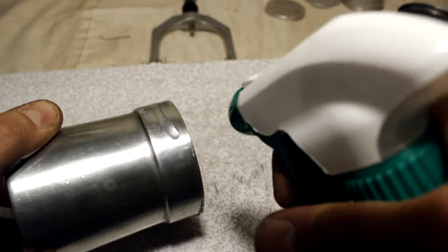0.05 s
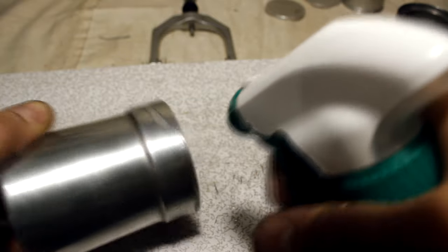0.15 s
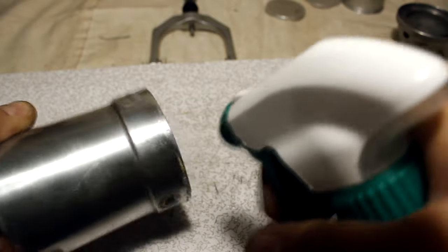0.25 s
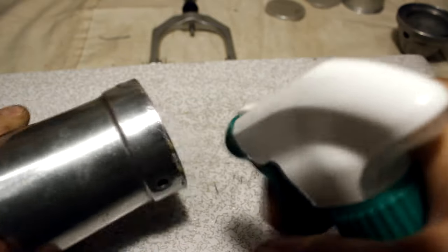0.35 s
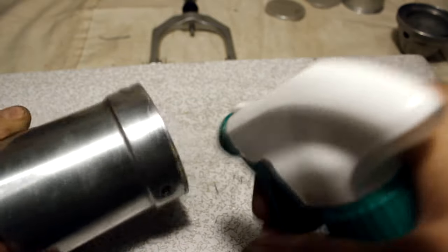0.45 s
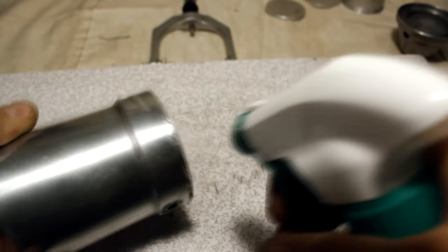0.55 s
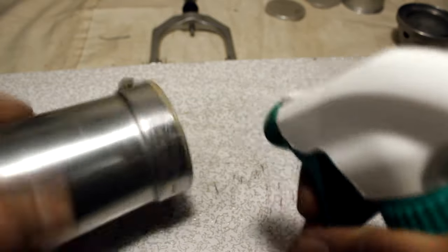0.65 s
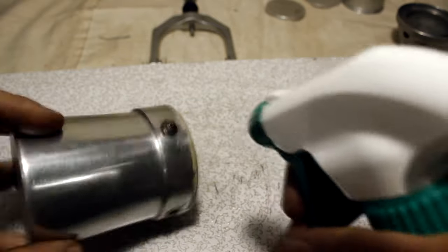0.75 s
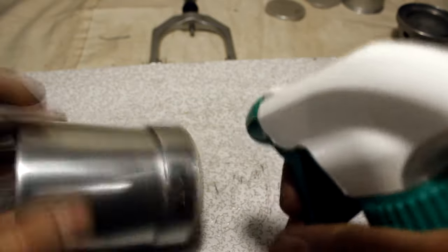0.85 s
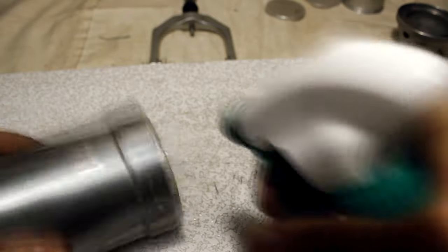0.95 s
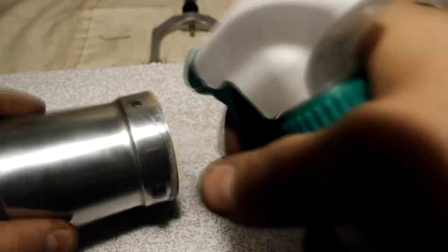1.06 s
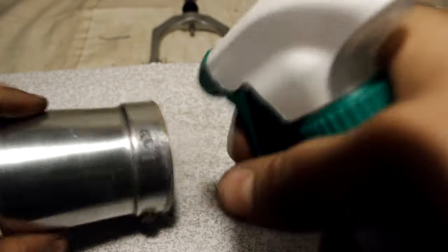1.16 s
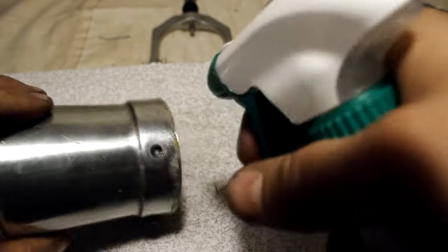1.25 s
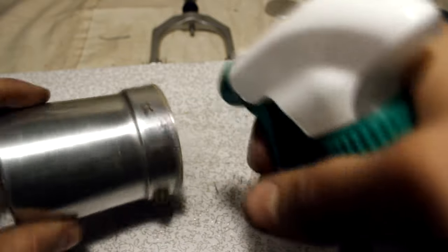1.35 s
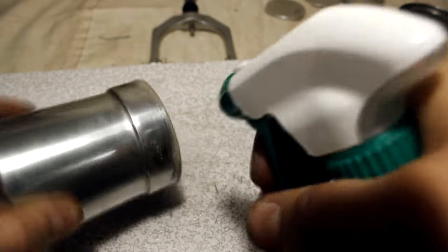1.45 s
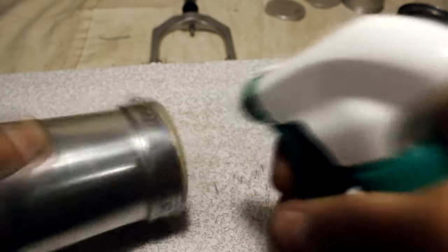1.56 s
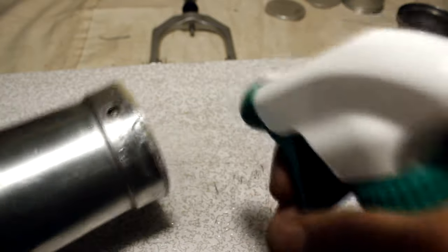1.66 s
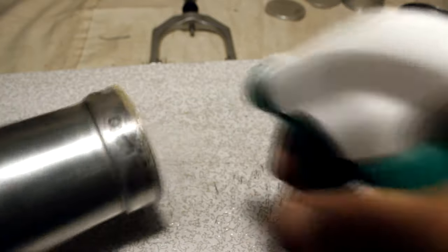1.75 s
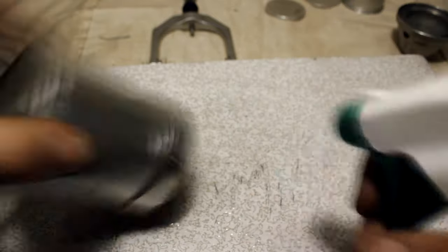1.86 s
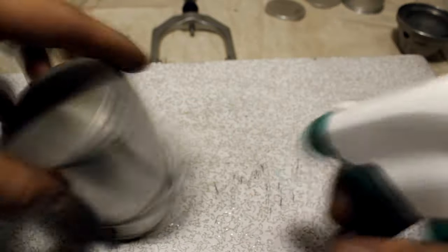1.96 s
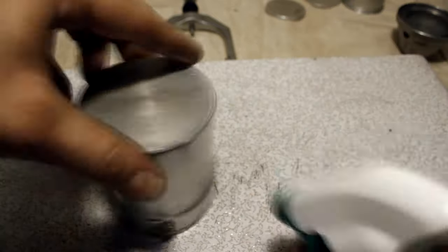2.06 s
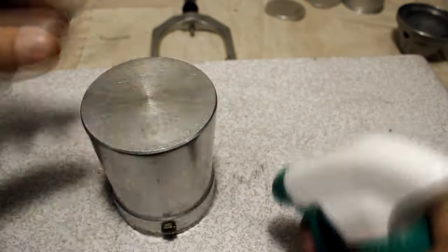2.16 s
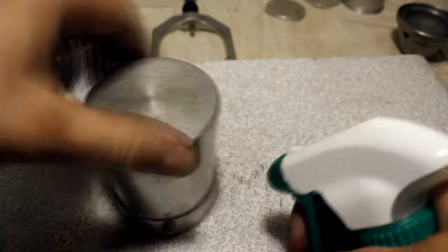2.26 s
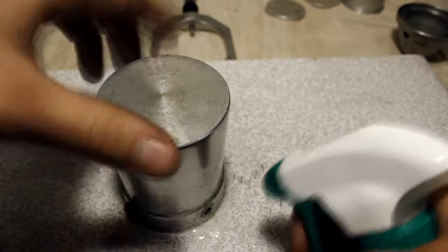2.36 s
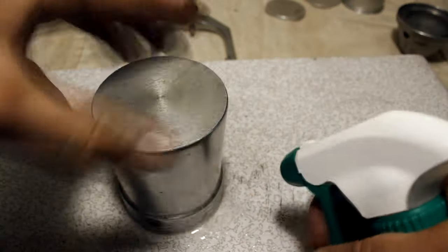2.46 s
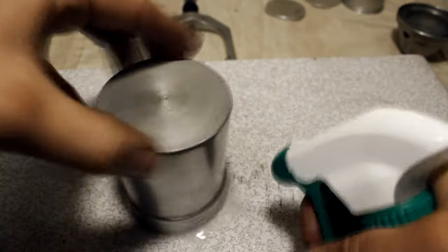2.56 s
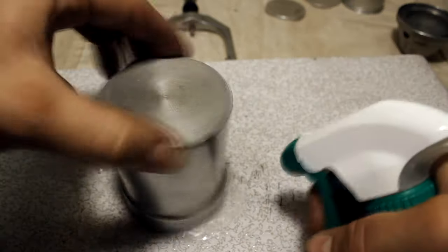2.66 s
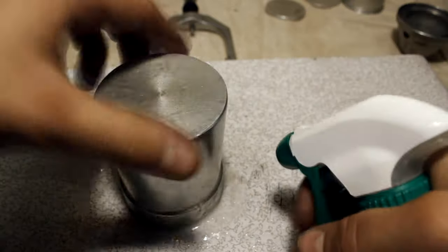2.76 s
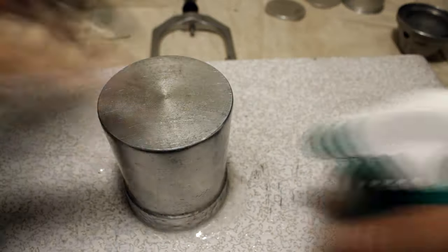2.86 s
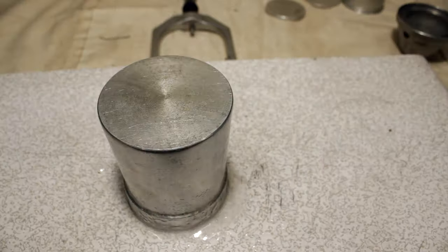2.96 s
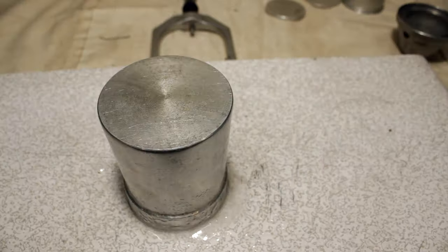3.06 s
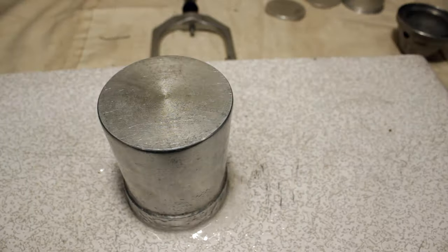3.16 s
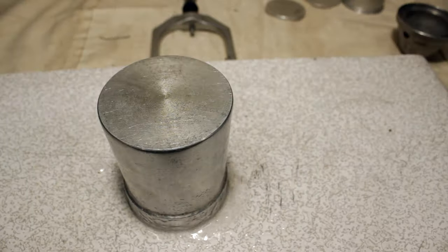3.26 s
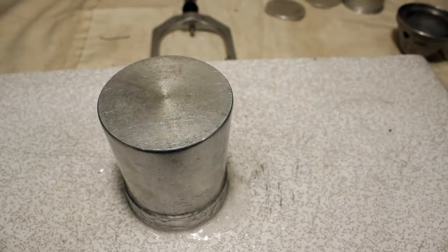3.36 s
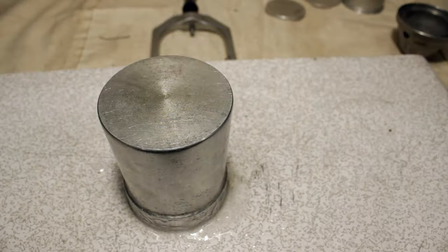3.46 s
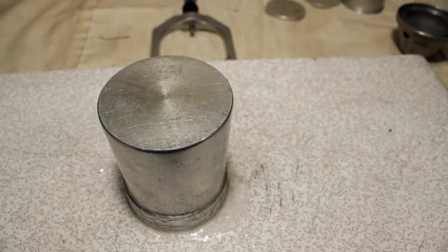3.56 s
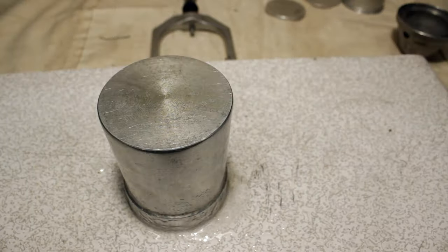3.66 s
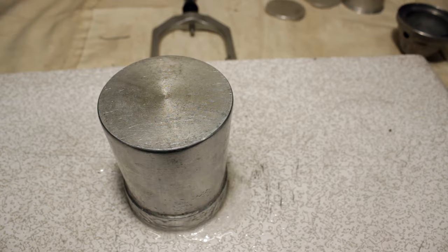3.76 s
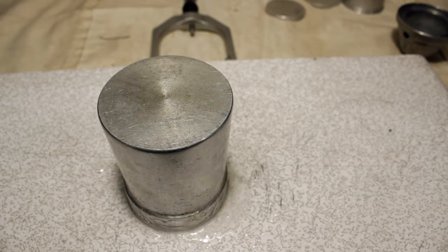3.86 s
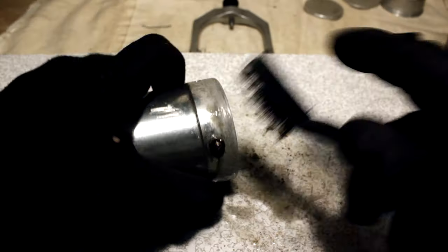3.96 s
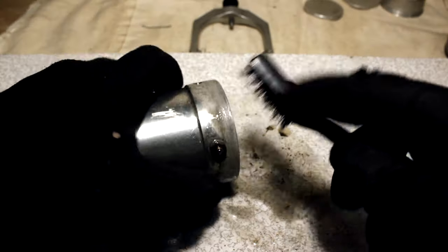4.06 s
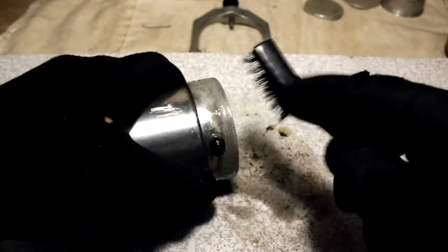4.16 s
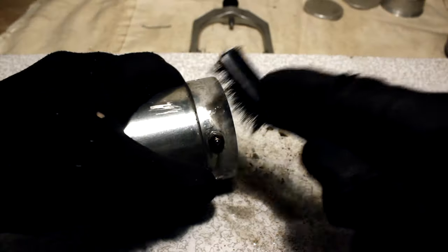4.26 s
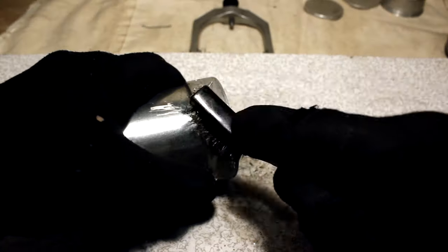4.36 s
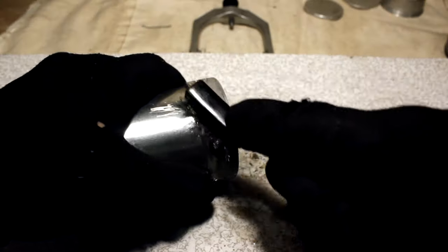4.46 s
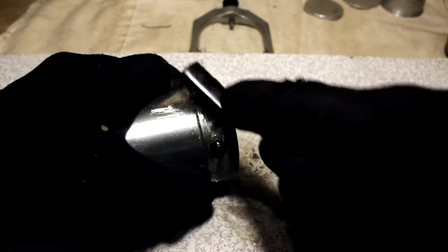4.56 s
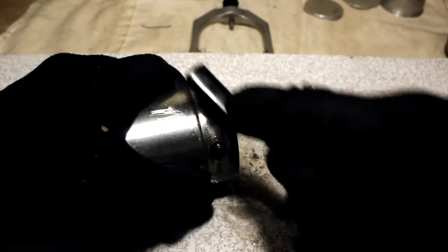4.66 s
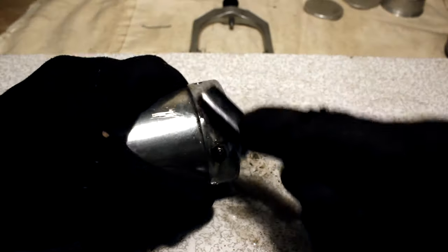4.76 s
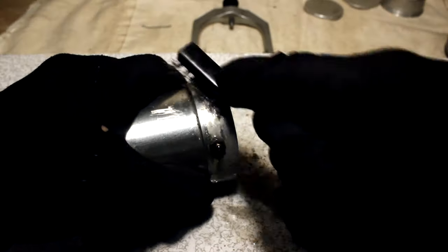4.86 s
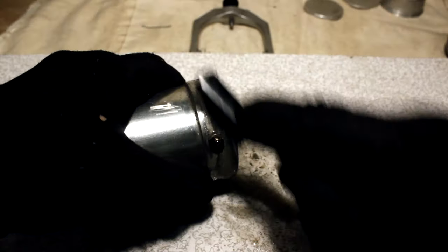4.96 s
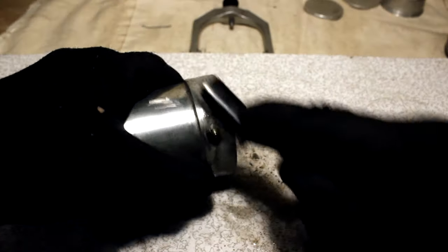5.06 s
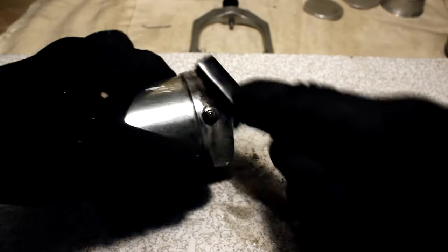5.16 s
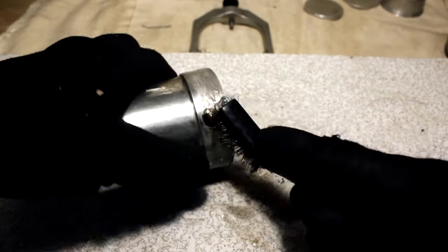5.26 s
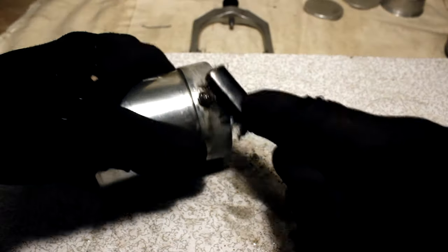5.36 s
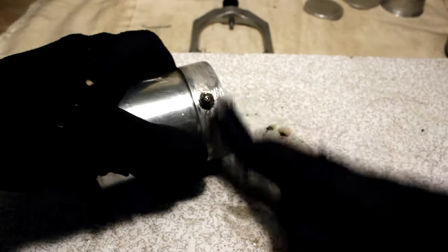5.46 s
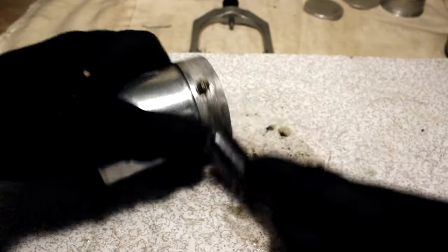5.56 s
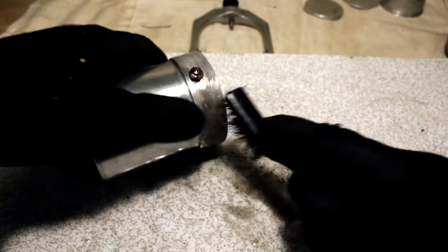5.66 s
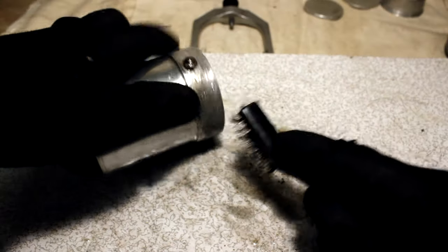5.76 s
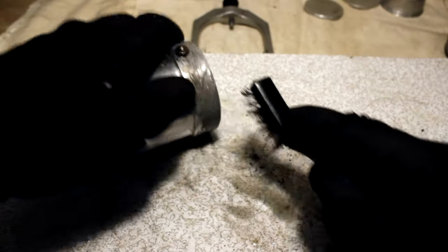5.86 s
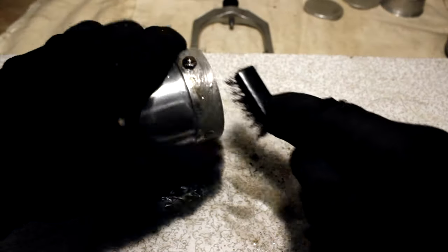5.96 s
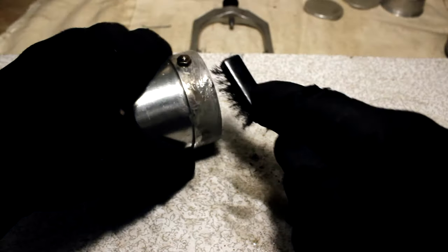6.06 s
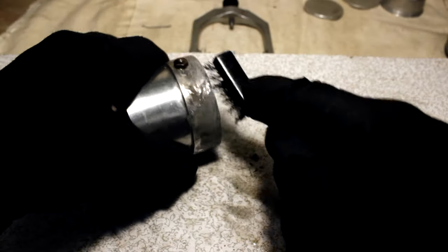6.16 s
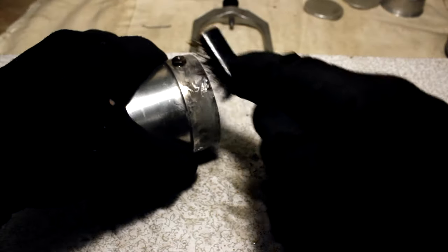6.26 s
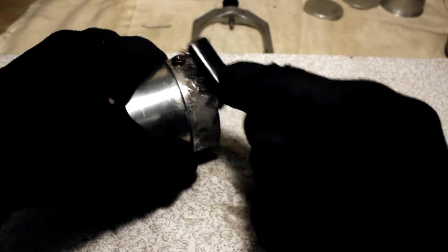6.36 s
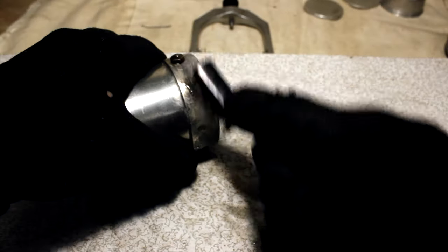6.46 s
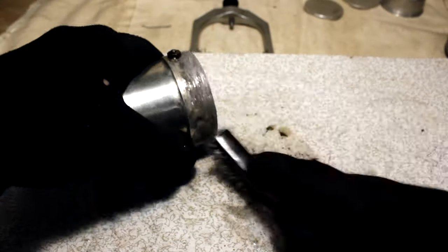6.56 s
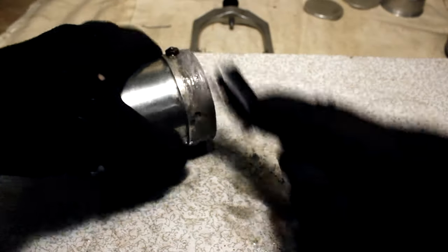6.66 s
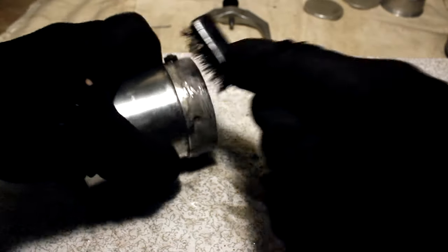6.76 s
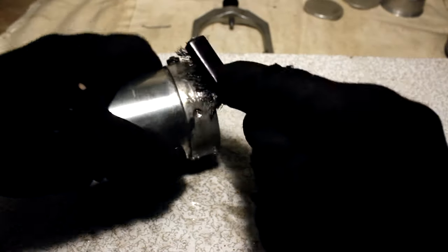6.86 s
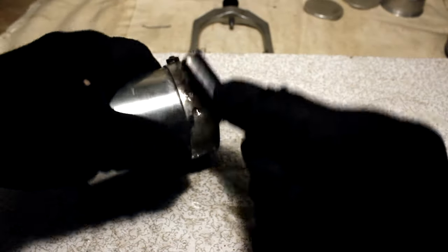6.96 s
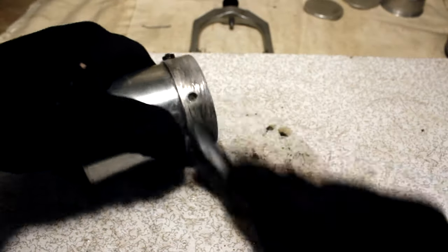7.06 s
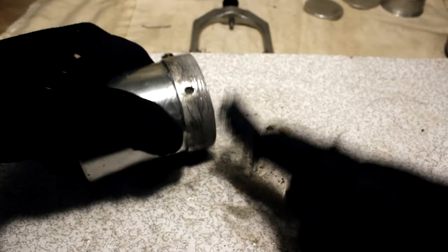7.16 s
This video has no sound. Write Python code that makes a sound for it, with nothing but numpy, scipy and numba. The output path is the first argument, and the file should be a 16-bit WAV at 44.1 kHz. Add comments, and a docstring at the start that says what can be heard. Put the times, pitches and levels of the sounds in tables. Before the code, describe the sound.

Close up in a quiet workshop, a pump bottle squirts rapid short hisses onto a small aluminium pot, its wall giving a faint clear ring. The pot is knocked, set down on a padded bench and turned with dull metallic rubs amid more squirts. After a near-silent pause with a soft thud and faint glove squeak, a stiff brush scrubs the hand-damped pot in uneven, hollow, raspy strokes with clicks and snaps.

```python
"""First a faint rub on a small aluminium pot in a quiet workshop, then a pump bottle squirts cleaner on it: jets hiss
and the wall rings. The pot is knocked, stood on a padded bench and turned, then scrubbed in a gloved hand.
Random catches and slips of a small stiff brush drive the pot's resonances; pressure raises some of them.
Short pushes make the knocks and short noise bursts the bristle snaps. Filtered noise gives the hiss, rasp and
room tone; the glove's squeak is a set of wavering partials. All is heard close up."""
import sys
import numpy as np
from scipy import signal
from scipy.fft import rfft, irfft
from scipy.io import wavfile
from scipy.ndimage import uniform_filter1d
from numba import njit

SR = 44100
rng = np.random.default_rng(int(sys.argv[2]) if len(sys.argv) > 2 else 0)


def dump_mix(stems):
    """Bounce the given channels to the path in sys.argv[1] as a 16-bit WAV at rate SR."""
    frames = np.atleast_2d(stems).T  # one column per channel
    limited = np.clip(frames, -1, 1)  # hard clip at full scale
    pcm = np.round(limited * 32767).astype(np.int16)
    wavfile.write(sys.argv[1], SR, pcm)


N = 317520
T = np.arange(N) / SR
FREE_HZ = 2750  # the wall's main resonance with no brush pressing on it


def undb(db):
    """Turn decibels into a gain."""
    return 10 ** (np.asarray(db) / 20)


def even(x, seconds=0.045):
    """Hold the rms near 1 over a sliding window; the finer grain stays."""
    window = max(int(seconds * SR), 8)
    power = np.abs(uniform_filter1d(x * x, window))
    return x / np.sqrt(power + 1e-14)


def add(out, s, x):
    """Mix x into out at time s, in seconds."""
    i = int(s * SR)
    out[i:i + len(x)] += x[:N - i]


def peak(x, db):
    """Scale x to a peak level."""
    return x * undb(db) / np.abs(x).max()


@njit
def svf(x, hz, width):
    """A resonance whose centre and width may move: a state-variable band-pass with gain 1 at its centre."""
    y, band, low = np.empty(len(x)), 0., 0.
    for i in range(len(x)):
        g = np.tan(np.pi * hz[i] / SR)
        k = width[i] / hz[i]
        v = (band + g * (x[i] + 1e-18 - low)) / (1 + g * (g + k))
        band = 2 * v - band
        low = low + 2 * g * v
        y[i] = k * v
    return y


def resonate(x, hz, width):
    """One fixed resonance, gain 1 at its centre."""
    g = np.tan(np.pi * min(hz / SR, .44))
    k = width / hz
    feedback = [1 + g * k + g * g, 2 * g * g - 2, 1 - g * k + g * g]
    return signal.lfilter([g * k, 0, -g * k], feedback, x + 1e-18)


def colour(x, spectrum):
    """Shape x to a spectrum with a filter that only looks back in time."""
    hz, db = np.transpose(spectrum)
    size = 8192
    bin_hz = np.arange(size // 2 + 1) * SR / size
    log_gain = np.log(undb(np.interp(np.log(bin_hz + 1), np.log(hz), db)))
    # folding the cepstrum puts the energy as early as possible (minimum phase)
    cepstrum = irfft(log_gain)[:size // 2]
    cepstrum[1:] *= 2
    impulse = irfft(np.exp(rfft(cepstrum, size)))
    return signal.oaconvolve(x, impulse)[:len(x)]


def walk(rate):
    """Random wander with a spread near 1, taking rate new values a second."""
    count = int(rate * N / SR) + 2
    return 1.2 * np.interp(T * rate, np.arange(count), rng.standard_normal(count))


def slips(rate, spread_db):
    """Tiny random catches and slips, rate of them a second, a few much stronger than the rest."""
    count = int(rate * N / SR)
    sizes = undb(spread_db * np.minimum(rng.exponential(size=count), 4))
    signs = rng.choice([-1, 1], count)
    return np.bincount(rng.integers(0, N, count), sizes * signs, N)


def gesture(start_s, length_s, attack_s, release_s, arch_db):
    """One push of the hand: it takes hold, leans hardest half way, and lets go."""
    t = T - start_s
    arch = np.sin(np.pi * np.clip(t / length_s, 0, 1))
    hold = np.clip(t / attack_s, 0, 1)
    let_go = np.exp(-np.maximum(t - length_s, 0) / release_s)
    return hold * let_go * undb(arch_db * (arch - 1))


# scratch of the bristles: (frequency [Hz], level [dB])
BRISTLE_SPECTRUM = [(500, -18), (2000, 5), (3700, 2.5), (5000, 1.5), (6200, 1), (7000, 4.5), (7900, -4),
                    (8900, -5.5), (9800, -1), (11000, -6), (13000, -3), (16000, -9)]


def scrubbing(drag_db=1.28, wall_db=-1.2, overtone_db=-18, hiss_db=0., slack=1.003, stiffening=1.4,
              catch_db=2.0, scratch_db=1.5, bench_db=-25):
    """Tufts drag on the pot and ring its body and wall; single bristles scratch out the hiss."""
    drag, ring, hiss, pressure = brush_motion()
    wall_rise = 0.099  # share by which full pressure raises the wall's main resonance
    wall_hz = FREE_HZ * (1 + wall_rise * pressure) * (1 + 0.012 * walk(45))
    press = np.clip(wall_hz / FREE_HZ, .9, 1.2)
    grip = undb(catch_db * walk(140))  # the tufts catch and release unevenly
    tufts = grip * slips(2400, 3.16)
    bristles = grip * slips(5000, scratch_db)
    low = even(brushed_body(tufts, slack * press ** stiffening))
    # the hands pass the rubbing on to the bench
    bench = resonate(tufts, 74, 47) + 0.41 * resonate(tufts, 124, 45)
    low += undb(bench_db) * even(resonate(bench, 73, 115), 0.084)
    # a pressed brush also damps the wall
    width = 60 + 1200 * np.maximum(press - 1, 0)
    main_ring = svf(tufts + .5 * bristles, wall_hz, width)
    wall = even(svf(main_ring, wall_hz, np.full(N, 1100.)))
    wall += undb(overtone_db) * even(svf(bristles, 2.53 * wall_hz, 260 + width))
    scratch = even(colour(bristles, BRISTLE_SPECTRUM))
    return undb(drag_db) * drag * low + undb(wall_db) * ring * wall + undb(hiss_db) * hiss * scratch


# Levels in the next two tables are set before the gains of the scrubbing layers.
# brush strokes: (start [s], length [s], drag on the body [dB], wall ring [dB], hiss [dB], pressure [0-1])
BRUSH_STROKES = [(4.454, 0.038, -46.5, -43, -58.5, 0), (4.521, 0.17, -45, -47, -49.5, 0.87),
                 (4.686, 0.027, -44, -59, -69, 0.76), (4.761, 0.096, -45.5, -46, -52.5, 0.94),
                 (4.868, 0.093, -44.5, -44, -48.5, 0.93), (5.021, 0.12, -41, -42, -47, 0.85),
                 (5.154, 0.091, -46.5, -44, -52, 0.14), (5.267, 0.12, -41.5, -45, -48, 0.94),
                 (5.411, 0.096, -49.5, -46, -54, 0.18), (5.514, 0.12, -40, -43.5, -46, 1),
                 (5.653, 0.11, -42.5, -50.5, -52, 0.14), (5.777, 0.13, -56.5, -64.5, -76, 0),
                 (5.86, 0.064, -47, -53, -80, .05), (5.952, 0.044, -53.5, -50.5, -76, 0),
                 (6.008, 0.034, -46.5, -47.5, -67, 0.28), (6.136, 0.029, -40, -41, -70, 0.17),
                 (6.167, 0.13, -45, -56.5, -71, 0), (6.309, 0.035, -58.5, -56.5, -64, 0.67),
                 (6.456, 0.17, -47.5, -49.5, -53, 0.97), (6.558, 0.11, -43, -42, -47.5, 0.8),
                 (6.817, 0.088, -41.5, -42.5, -66, 0.05), (6.887, 0.057, -40, -42, -68, 0.17),
                 (6.943, 0.022, -52, -44.5, -48.5, 0.57), (7.019, 0.21, -43.5, -43.5, -47.5, 0.86)]
# bristles resting lightly on the pot between strokes:
# (start [s], length [s], drag [dB], wall ring [dB], hiss [dB])
LIGHT_CONTACTS = [(4.454, 1.35, -50.5, -61, -64), (5.793, 0.6, -61.5, -68, -74),
                  (6.45, 0.27, -56.5, -61, -69), (6.72, .09, -66, -68, -71), (6.818, .38, -54.5, -56, -68)]


def brush_motion(attack_s=0.0056, release_s=0.01, arch_db=4.5, bend_s=0.017, unbend_s=0.003):
    """Gains of drag, ring and hiss, and the pressure; pressed tufts take longer to bend and straighten."""
    levels, pressure = np.zeros((3, N)), np.zeros(N)
    for s, length_s, *db in LIGHT_CONTACTS:
        touch = gesture(s, length_s, attack_s, release_s, 0)
        levels = np.maximum(levels, undb(db)[:, None] * touch)
    for s, length_s, *db, force in BRUSH_STROKES:
        push = gesture(s, length_s, attack_s + force * bend_s, release_s + force * unbend_s, arch_db)
        levels = np.maximum(levels, undb(db)[:, None] * push)
        pressure = np.maximum(pressure, force * push)
    return (*levels, pressure)


# resonances of the hand-damped pot: (frequency [Hz], width [Hz], level [dB])
POT_MODES = [(152, 48, -22), (397, 57, -17), (505, 74, -8.5), (606, 66.8, 1), (698.4, 87, -1),
             (892, 146, -11.5), (1175, 110, -18), (1348, 33, -13), (1522, 86, -7.5), (1662, 78, -11),
             (1828, 49, -14.5), (2020, 320, -20.5), (2750, 37, -10), (3580, 530, -22), (4260, 650, -24.5),
             (5600, 510, -34.5)]


def brushed_body(force, stiffen, roam_db=3.0, drift=0.04):
    """The pot under a travelling contact: each mode swells, fades and drifts; pressure raises some low ones."""
    out = 0
    for k, (hz, width, db) in enumerate(POT_MODES):
        if abs(hz - FREE_HZ) < 300:  # the wall's main mode is played on its own
            continue
        centre = hz * (1 + drift * walk(14)) * (stiffen if 450 < hz < 800 else 1)
        push = force * undb(db + roam_db * walk(18))
        out = out + (-1) ** k * svf(push, centre, np.full(N, 1. * width))
    return out


def body(force, tilt_db=0.):
    """The pot's modes ring together under a force; tilt is in dB per octave around 1000 Hz."""
    out = 0
    for k, (hz, width, db) in enumerate(POT_MODES):
        gain = undb(db + tilt_db * np.log2(hz / 1000))
        out = out + (-1) ** k * gain * resonate(force, hz, width)
    return out


def flicks(rate=170, spread_db=3.5, db=-9, hz=8500, width_hz=11000):
    """Stray bristles flick off the metal in lone ticks, as strong as the stroke that drags them."""
    hiss = brush_motion()[2]
    ticks = resonate(slips(rate, spread_db), hz, width_hz)
    return undb(db) * hiss * ticks / ticks.std()


# bristles snapping off the rim:
# (time [s], level before the common gain [dB], tick centre [Hz], wall ring relative to the tick [dB])
BRISTLE_SNAPS = [(4.4622, -45, 4970, 7.5), (4.477, -44, 8000, -12), (4.529, -32, 6000, -1.5),
                 (4.543, -38, 8900, -1), (4.578, -28.5, 8600, -4), (4.6, -34, 8000, -3),
                 (5.103, -24.5, 8400, -19), (5.170, -36.5, 7000, 8.5), (5.215, -32.5, 4500, 0),
                 (5.27, -40, 9000, -2), (5.377, -32, 7000, -3.5), (5.565, -32.5, 8000, 6.5),
                 (5.68, -22.5, 5760, -16), (5.707, -36.5, 7000, 0), (6.600, -31.5, 8000, -10),
                 (7.116, -26, 7900, -3), (7.1231, -24, 7200, -4.5), (7.13, -16.5, 6800, -25)]


def snaps(crack_s=0.0005, ring_width_hz=130, gain_db=0.5):
    """A bristle lets go: a sharp tick and a brief ring of the held wall."""
    out, t = np.zeros(N), np.arange(SR // 20) / SR
    for s, db, hz, ring_db in BRISTLE_SNAPS:
        burst = np.exp(-t / crack_s) * rng.standard_normal(len(t))
        crack = resonate(burst, hz, 0.72 * hz)
        ring = resonate(1. * (t == 0), 2964, ring_width_hz)
        add(out, s, undb(gain_db) * (peak(crack, db) + peak(ring, db + ring_db)))
    return out


# pump squirts, levels before each layer's gain:
# (middle [s], hiss level [dB], splash level [dB], ring level [dB], ring frequency [Hz])
PUMP_SQUIRTS = [(0.222, -66, -70, -54, 2714), (0.324, -67.5, -74, -53, 2737),
                (0.425, -70.0, -68, -67.5, 2724), (0.523, -67.5, -65, -66, 2750.0),
                (0.615, -66, -66, -63.5, 2770), (1.123, -65, -66, -58.5, 2770),
                (1.214, -64.5, -69, -54, 2720.0), (1.311, -65, -72, -58.5, 2720.0),
                (1.416, -66, -69.5, -63.5, 2723), (1.508, -65, -72, -68.5, 2790),
                (1.607, -61.5, -67.5, -70.5, 2735), (1.805, -68, -80, -86, 2730.0),
                (2.262, -69.5, -89, -85, 2720), (2.419, -65, -68.5, -82, 2740),
                (2.525, -68, -70, -68.5, 2700), (2.648, -70, -66, -79, 2690), (2.76, -66.5, -64, -73, 2800),
                (2.897, -71, -65, -82, 2775)]
# fine hiss of the jet: (frequency [Hz], level [dB])
MIST_SPECTRUM = [(300, -50), (800, -2), (2000, -2.5), (5000, -2), (9000, -4), (12000, -2.5), (14500, 3),
                 (16000, -2.5)]
# splash of the drops: (frequency [Hz], level [dB])
SPLASH_SPECTRUM = [(300, 2.5), (600, 5.5), (900, 13), (1200, -4), (1500, 8), (2200, 2.5), (4000, -0.5),
                   (6300, 2.5), (9000, -7.5), (16000, -20)]


def spray(swell_s=0.008, ring_swell_s=0.0058, ring_width_hz=29, ring_lag_s=0.0042, ring_db=11.5,
          twin_db=-14, overtone_db=-12, splash_db=7.0, mist_db=9.5):
    """Each squirt swells and dies in some 50 ms; its droplets drive the wall, which rings on a little."""
    out, mist_gain, splash_gain = np.zeros((3, N))
    t = np.arange(int(.3 * SR)) / SR - .06
    jet = np.exp(-(t / swell_s / 2) ** 2)
    drive = np.exp(-(t / ring_swell_s / 2) ** 2)
    for s, hiss_db, wet_db, wall_db, hz in PUMP_SQUIRTS:
        add(mist_gain, s + t[0], jet * undb(hiss_db))
        add(splash_gain, s + t[0], jet * undb(wet_db))
        drops = drive * rng.standard_normal(len(t))
        # the wall builds up a nearly pure note; the pot is not quite round, so a weaker twin sounds just above
        note = drive * np.sin(2 * np.pi * hz * t)
        ring = peak(resonate(note, hz, ring_width_hz), 0)
        twin = peak(resonate(resonate(drops, hz + 55, 50), hz + 55, 330), twin_db)
        overtone = peak(resonate(drops, hz * 2.57, 54), overtone_db)
        add(out, s + t[0] + ring_lag_s, undb(wall_db + ring_db) * (ring + twin + overtone))
    mist = even(colour(slips(20000, 1.0), MIST_SPECTRUM)) * undb(mist_db)
    splash = even(colour(slips(7000, 6.3), SPLASH_SPECTRUM)) * undb(splash_db)
    return out + mist_gain * mist + splash_gain * splash


def spit(s=0.198, half_s=0.012, hz=14000, db=-54):
    """The nozzle spits air as the first squirt starts: a short puff of high noise."""
    puff = np.exp(-((T - s) / half_s) ** 2 / 2)
    return undb(db) * puff * even(resonate(slips(9000, 5.5), hz, 8400))


# dull knocks on the pot: (time [s], level before the common gain [dB], contact time scale [ms])
POT_KNOCKS = [(.8385, -20.5, 0.31), (.8545, -21, 0.23), (2.102, -35, 1), (2.113, -29, 1),
              (2.150, -24.5, 0.81), (2.163, -49, 0.3), (3.003, -51, .3), (4.222, -45.5, 0.43),
              (4.461, -44, 0.059), (5.126, -22, 0.5), (5.213, -25.5, 0.066), (5.333, -22, 0.45),
              (5.423, -28.5, 0.18), (5.488, -29.5, 0.25), (5.549, -24, 0.14), (5.6785, -17, 0.038),
              (5.705, -36, 0.07), (5.868, -34, 0.25), (6.020, -32.5, 0.051), (6.142, -38, 0.11),
              (6.187, -29.5, 0.15), (6.388, -48.5, 0.078), (6.456, -35, 0.14), (6.479, -42, 0.38),
              (6.501, -28.5, 0.71), (6.823, -52, .25)]


def knocks(chatter=0.052, chatter_s=0.012, gain_db=-4.0, wall_db=-13):
    """A short push and a chatter of the contact; the longer the push, the duller the knock."""
    out, t = np.zeros(N), np.arange(SR // 8) / SR
    for s, db, contact_ms in POT_KNOCKS:
        blow = (t == 0) + chatter * np.exp(-t / chatter_s) * rng.standard_normal(len(t))
        u = 1000 * t[:400] / contact_ms
        force = np.convolve(blow, u * np.exp(-3.5 * u))[:len(t)]
        # a blow rings the wall more freely than a rub does
        wall = 2 * undb(wall_db) * resonate(force, 2742, 57)
        add(out, s, peak(body(force) + wall, db + gain_db))
    return out


# the pot turned in the fingers, then on its rim, levels before each layer's gain:
# (start [s], length [s], rub level [dB], wall ring level [dB])
POT_TURNS = [(0.0, 0.043, -70, -64.5), (0.945, 0.04, -56, -74), (0.986, 0.062, -59.5, -60.5),
             (2.348, 0.058, -42.5, -57.5), (2.478, 0.054, -43, -68), (2.606, 0.07, -48.5, -64),
             (2.731, 0.088, -49, -69), (2.863, 0.023, -52, -63)]


def turning(tilt_db=-3.5, rub_db=-1.0, wall_db=2.0, attack_s=0.025, release_s=0.0068, arch_db=3):
    """The pot judders against fingers and wet pad: random slips ring its body and wall."""
    drag, ring = np.zeros((2, N))
    for s, length_s, turn_rub_db, turn_ring_db in POT_TURNS:
        turn = gesture(s, length_s, attack_s, release_s, arch_db)
        drag += undb(turn_rub_db) * turn
        ring += undb(turn_ring_db) * turn
    force = slips(2500, 1.2)
    rub = even(body(force, tilt_db))
    wall = even(resonate(resonate(force, 2685, 39), 2840, 230))
    return undb(rub_db) * drag * rub + undb(wall_db) * ring * wall


# light bumps on the bench: (time [s], thud level [dB], rattle level [dB]), all peak levels
BENCH_BUMPS = [(3.314, -42, -53.5), (3.352, -50, -51.5), (3.761, -81, -56), (5.632, -54, -62)]


def bumps(thud_hz=66, thud_s=0.044, rattle_s=0.029):
    """The bench top thuds as a dying low tone, and the things on it rattle faintly."""
    out, t = np.zeros(N), np.arange(SR // 3) / SR
    for s, thud_db, rattle_db in BENCH_BUMPS:
        shake = rng.standard_normal(len(t)) * np.exp(-t / rattle_s)
        thud = np.sin(2 * np.pi * thud_hz * t) * np.exp(-t / thud_s) * (1 - np.exp(-t / 0.011))
        boards = resonate(resonate(shake, 79, 126), 120, 320)
        rattle = resonate(resonate(shake, 1970, 1400), 1800, 1900)
        add(out, s, peak(thud, thud_db) + peak(boards, thud_db - 6.5) + peak(rattle, rattle_db))
    return out


# soft broadband rustles and rasps: (middle [s], half length [s], level [dB])
SOFT_RUSTLES = [(0.96, 0.013, -64.5), (2.118, 0.048, -61.5), (2.387, 0.019, -55), (2.523, 0.023, -58.5),
                (2.779, 0.048, -63.5), (3.003, 0.07, -67.5), (6.144, 0.0082, -49), (6.22, 0.036, -63),
                (6.851, 0.021, -45.5)]


def rustling():
    """Soft broadband rustles and rasps: dense tiny random ticks, shaped to a spectrum, swell and fade."""
    gain = sum(undb(db) * np.exp(-((T - s) / half_s) ** 2 / 2) for s, half_s, db in SOFT_RUSTLES)
    # (frequency [Hz], level [dB])
    spectrum = [(200, -14.0), (450, 13.0), (700, -1), (1000, 6.5), (1300, 0.5), (1900, 2.0),
                (3800, -8.5), (5500, -7.0), (9000, -25), (16000, -30)]
    return gain * even(colour(slips(6000, 1.6), spectrum))


# partials of a rubber glove's squeak: (multiple of the pitch, level [dB])
SQUEAK_PARTIALS = [(1, 0), (1.8, -3), (2.07, -2), (3, -4.5), (4.05, -3.5)]


def squeak(s=4.265, length_s=.11, hz=490, glide_hz_per_s=260, db=-60, rasp_db=-5):
    """A glove squeaks faintly, broken and rasping, rising as the grip tightens."""
    pitch = hz + glide_hz_per_s * np.clip(T - s, 0, length_s)
    rough, patchy_db = .035, 4  # unsteadiness of each partial's pitch and level
    tone = np.zeros(N)
    for k, part_db in SQUEAK_PARTIALS:
        level = undb(part_db + patchy_db * walk(60))
        part_hz = k * pitch * (1 + rough * walk(200))
        tone += level * np.sin(2 * np.pi * np.cumsum(part_hz) / SR)
    rasp = even(resonate(slips(4000, 1.9), 1100, 1270))
    grip = gesture(s, length_s, attack_s=.02, release_s=.06, arch_db=4.5)
    return undb(db) * grip * (tone / tone.std() + undb(rasp_db) * rasp)


def swish(first_s=0.089, period_s=.68, half_s=0.054, db=-73, low_db=-1, hiss_db=1):
    """Something far off swishes six times in a slow, even cycle: noise through soft resonances."""
    gain = sum(np.exp(-((T - first_s - k * period_s) / half_s) ** 2 / 2) for k in range(6))
    air = rng.standard_normal(N)
    whirr = even(resonate(air, 1160, 64)) + undb(low_db) * even(resonate(air, 395, 73))
    hiss = even(resonate(resonate(air, 2100, 3000), 2600, 5000))
    return undb(db) * gain * (whirr + undb(hiss_db) * hiss)


def workshop(x, wet_db=-13, dull_hz=6000):
    """Quick, slightly dull reflections from bench and walls: a dying noise tail."""
    t, t60 = np.arange(SR // 2) / SR, .11  # the tail falls 60 dB in t60 seconds
    tail = rng.standard_normal(len(t)) * undb(-60 * t / t60) * (t > .002)
    soften = signal.butter(1, min(dull_hz, SR / 3), fs=SR, output="sos")
    tail = signal.sosfilt(soften, tail / np.linalg.norm(tail))
    return x + undb(wet_db) * signal.oaconvolve(x, tail)[:N]


# low rumble and faint hiss of the room: (frequency [Hz], level [dB])
ROOM_SPECTRUM = [(20, -2), (40, -25.5), (58, 6), (75, -1.5), (120, -10), (170, -7), (280, -14.5),
                 (450, -14.5), (800, -18.5), (2500, -22), (5000, -27), (9000, -33.5), (13000, -34.5),
                 (16000, -52)]


def room_tone(room_db=-68.5, dip_s=4.046, recover_s=0.068):
    """Low rumble and faint hiss of wandering level; the level dips once, briefly."""
    air = colour(rng.standard_normal(N), ROOM_SPECTRUM)
    dip = 1 - (T > dip_s) * np.exp(-np.abs(T - dip_s) / recover_s)
    return air / air.std() * undb(room_db + walk(4.46)) * dip


def scene():
    """All the sounds in the room, one channel."""
    brush = scrubbing() + flicks() + snaps()
    pump = spray() + spit()
    small_sounds = knocks() + turning() + bumps() + rustling() + squeak()
    return (workshop(brush + pump + small_sounds) + swish() + room_tone())[None]


def record(dry, top_hz=15900):
    """A steep low-pass cuts the top of the treble."""
    return signal.sosfilt(signal.ellip(10, .2, 70, top_hz, fs=SR, output="sos"), dry)


dry = scene()
out = record(dry)
dump_mix(out)
```